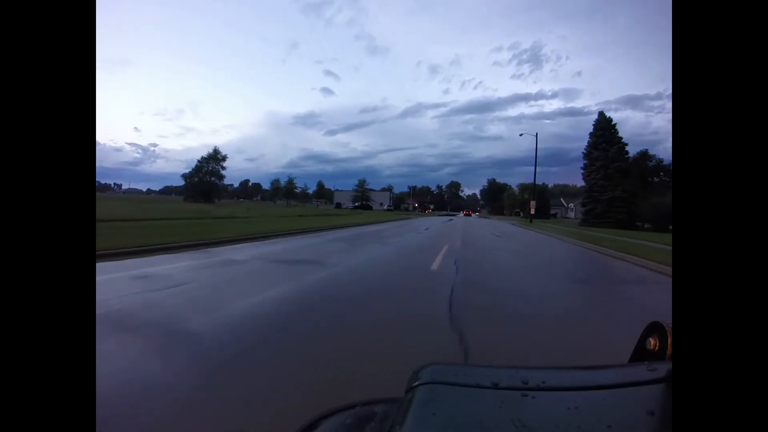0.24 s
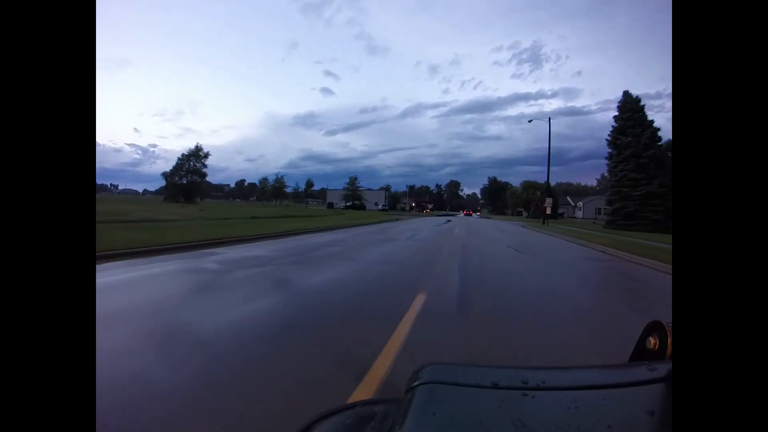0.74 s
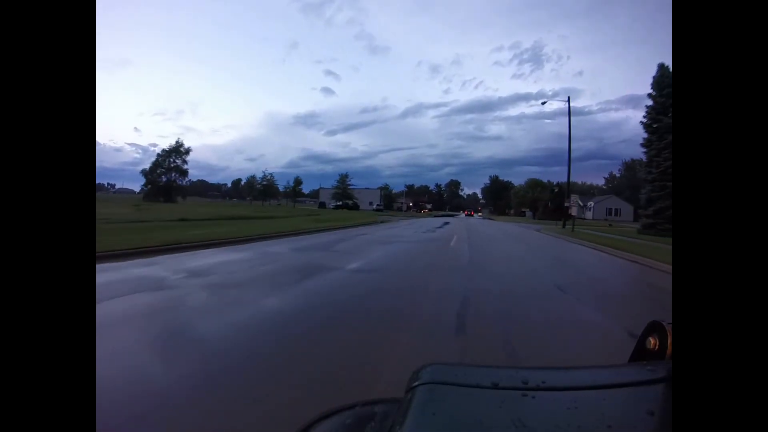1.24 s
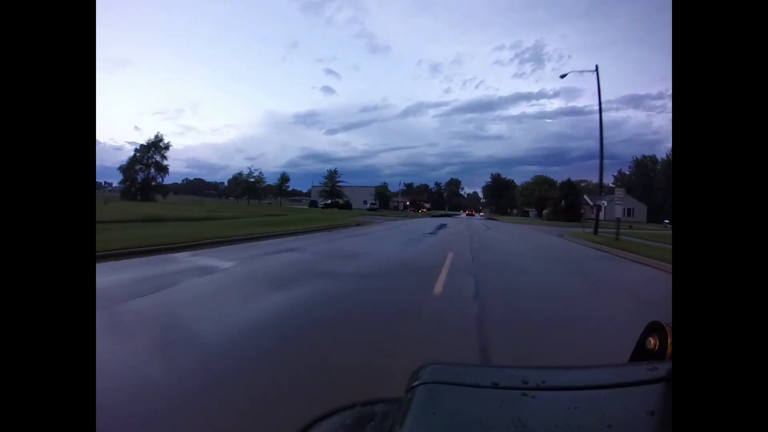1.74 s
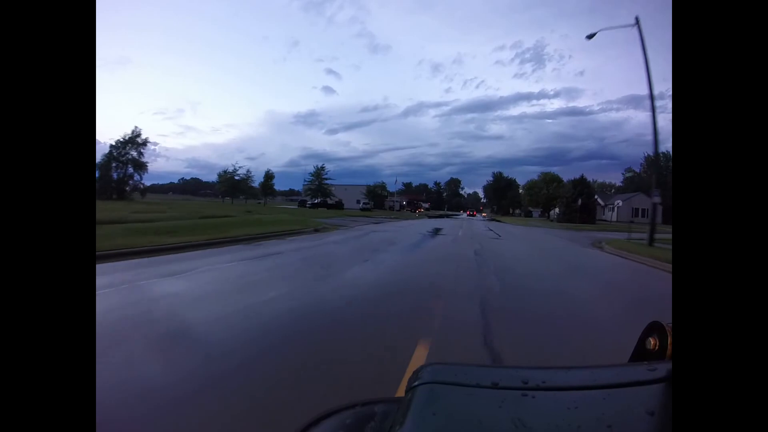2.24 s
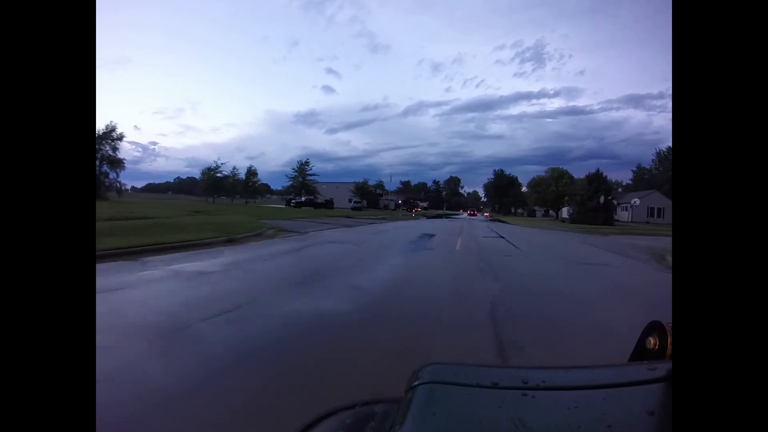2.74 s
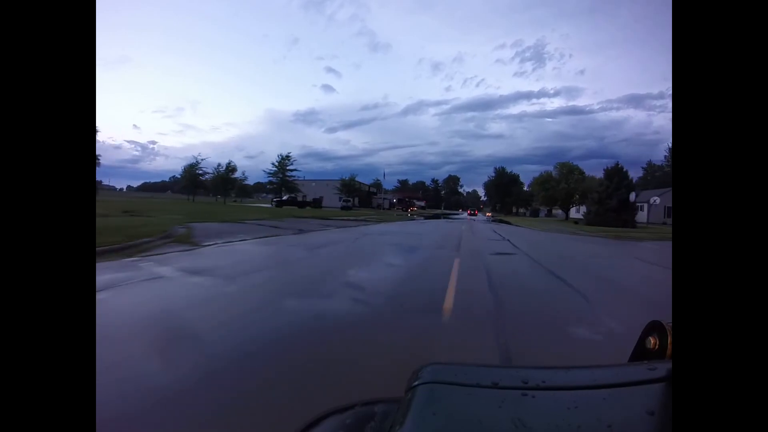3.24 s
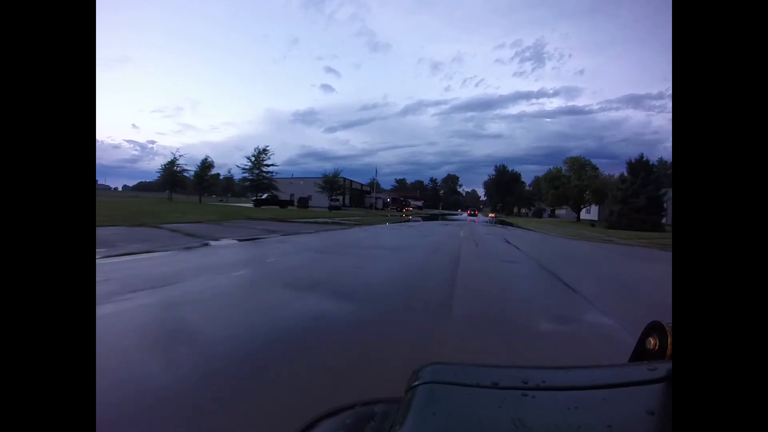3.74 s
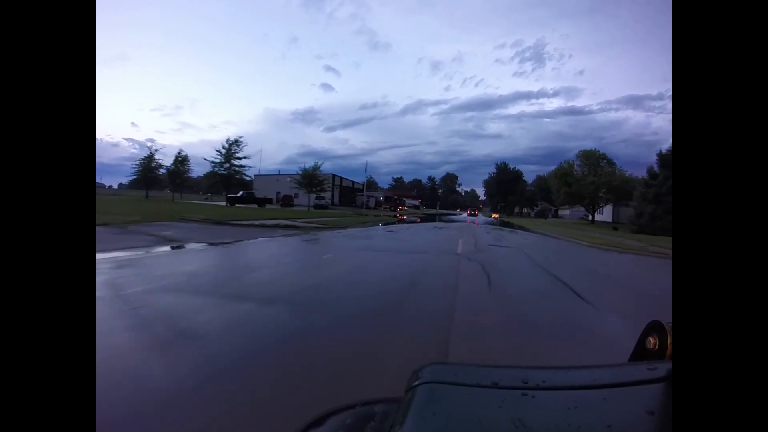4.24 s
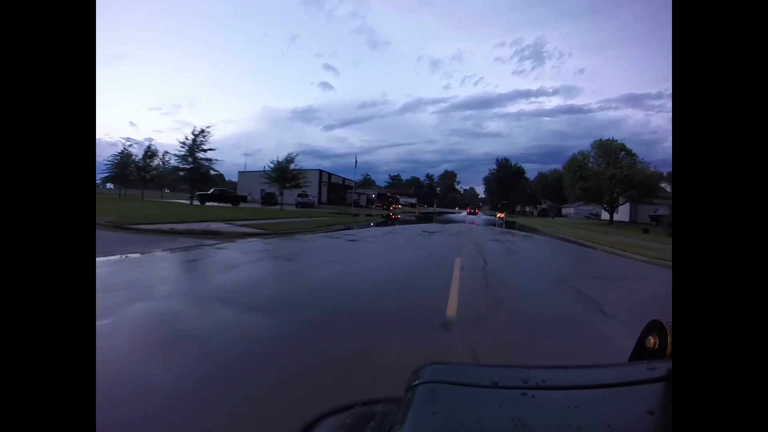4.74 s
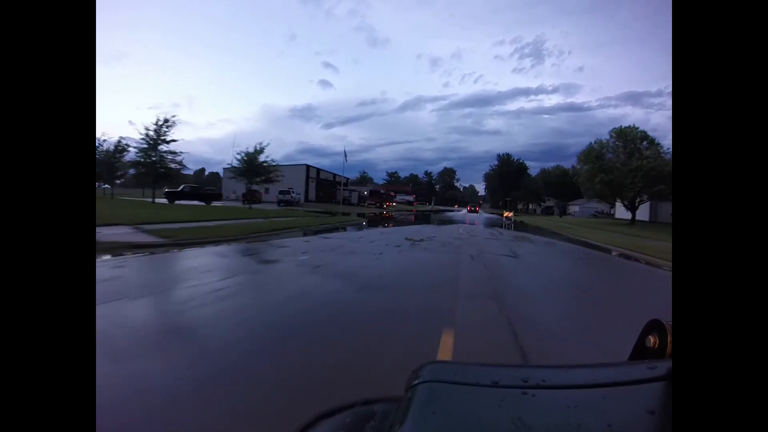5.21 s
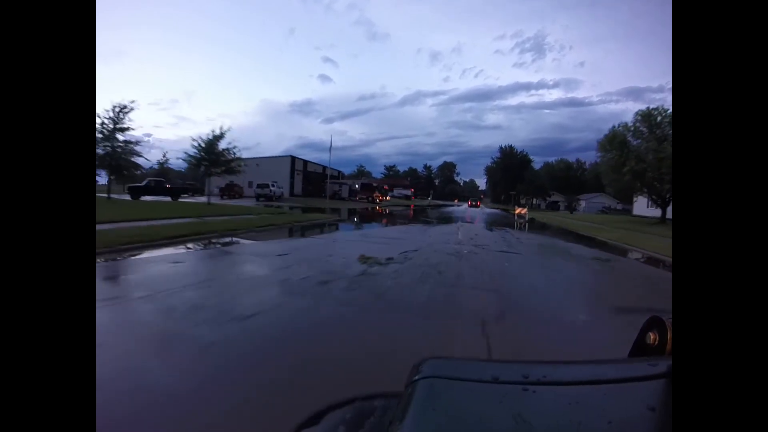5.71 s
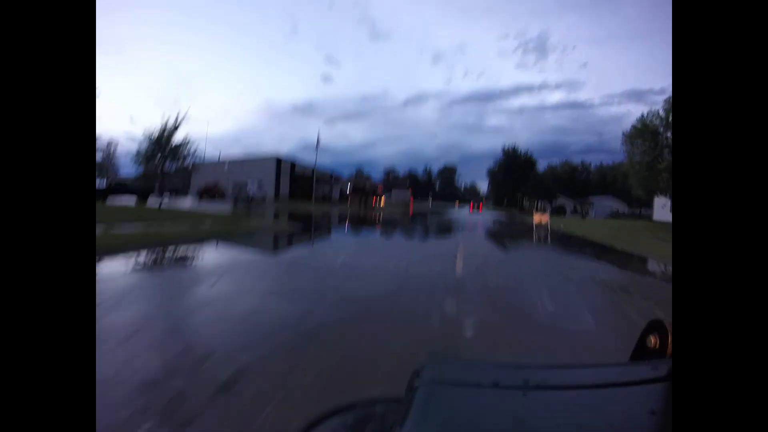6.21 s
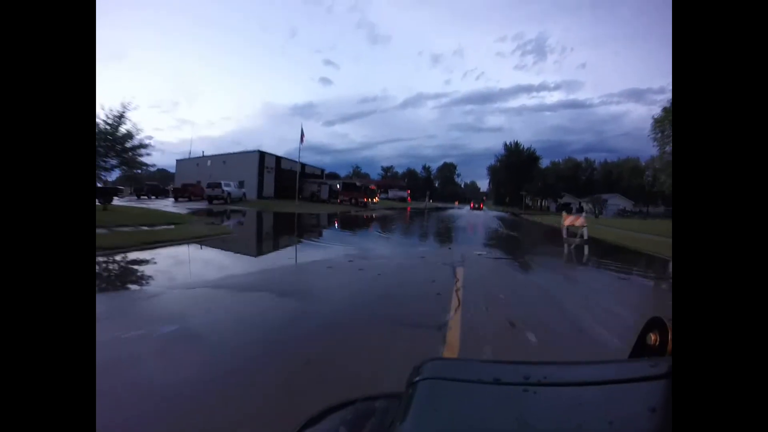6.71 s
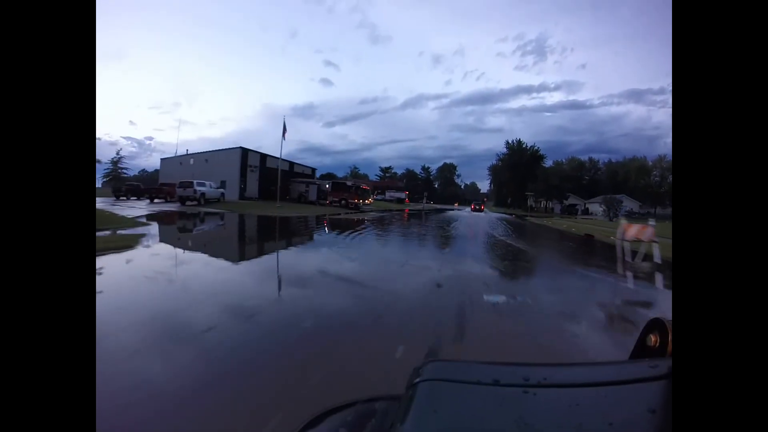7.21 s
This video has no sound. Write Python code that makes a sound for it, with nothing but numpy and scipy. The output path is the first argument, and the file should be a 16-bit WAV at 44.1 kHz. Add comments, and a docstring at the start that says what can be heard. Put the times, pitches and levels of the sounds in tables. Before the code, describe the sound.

A vehicle drives along a wet street in the open air, heard from a microphone mounted on its body. From 0 s, deep road rumble, drivetrain drone and soft tyre hiss run together, with puddle splashes before 0.4 s. Wind buffeting swells strongly from about 0.4 to 1.2 s, a low throbbing with fluttery gusts. A dull knock and body thump land at 1.9 s, a smaller one at 2.2 s with a sharp tick, and a gust at 2.6 s. Between 3.7 and 4.6 s come light plastic knocks and gusts; more small bumps follow at 5.2 and 5.4 s. The drone gradually sinks and fades. Around 5.9 s the wind falls away, and watery hiss and fine spray rise. At 6.25 s a hard, boomy double bump rattles the mount with a brief splash; a softer thud follows at 6.7 s. Rumble and spray continue, with slight wind near 7.4 s.

```python
"""Wind buffets the microphone first, over the low road rumble of a vehicle on a wet street, slowing into floodwater.
The place is open air; the microphone rides in a camera on the body, with no distance to any source but the mount.
Wind, rumble, tyre hiss and spray are shaped noise, the last two with droplets; the drivetrain drone is a set of sines.
Puddle splashes are bursts of droplets; mount knocks and body thumps, hardest over a bump in the flooded stretch,
are decaying sines, and one tick is a pressure step. The camera's case colours all but drone, thumps and tick."""
import sys
import numpy as np
from scipy import signal
from scipy.fft import rfft, irfft, next_fast_len
from scipy.io import wavfile
from scipy.ndimage import uniform_filter1d, map_coordinates

SR = 44100
rng = np.random.default_rng(int(sys.argv[2]) if len(sys.argv) > 2 else 0)


def generate_wav(signal):
    """Clip the signal to [-1, 1] and save it as 16-bit WAV at the path in sys.argv[1]."""
    frames = np.transpose(np.atleast_2d(signal))
    scaled = np.clip(frames, -1, 1) * 32767
    pcm = np.round(scaled).astype(np.int16)
    wavfile.write(sys.argv[1], SR, pcm)


N = 328986

# airflow at the microphone, dropping as the vehicle brakes for the flood: start_s [s], buffet_db [dB before gusts]
WIND_LEVEL = [(0, -31), (.45, -25.5), (.9, -25), (1.35, -30.5), (1.8, -29), (2.15, -30), (2.75, -29),
              (3.3, -30.5), (3.9, -28), (4.7, -28.5), (5.55, -30.5), (5.88, -54), (6.55, -48), (7.46, -40)]
# single gusts, and lulls where negative: peak_s [s], lift_db [dB]
GUST_LIFTS = [(.36, 4), (1.61, 5.5), (1.92, 6), (2.32, -3), (2.635, 8.5), (3.72, 6), (4.178, 5.5),
              (4.559, 10), (5.16, 5), (5.09, -5.5), (5.36, -12), (5.502, 3.5), (7.41, 7.5)]
# wind spectrum at the microphone: frequency_hz [Hz], density_db [relative dB per Hz]
BUFFET_SPECTRUM = [(10, -7), (22, -6.5), (33, -2.5), (43, 2.5), (50, -1), (58, 1), (72, -11), (95, -20),
                   (160, -15.5), (200, -18), (235, -29), (400, -38), (1000, -67.5), (3000, -88)]
# road and tyres, the hiss fading as the vehicle slows and returning in deeper water:
# start_s [s], rumble_db [dB before trim], hiss_db [dB before trim], spray_db [dB before trim]
ROAD_LEVELS = [(0, -39.5, -47, -61), (1.2, -39, -47, -62.5), (2.4, -40.5, -47.5, -62.5),
               (3.1, -44, -50, -63), (3.6, -41, -49, -64), (4.3, -42, -51, -67.5),
               (5.45, -40, -54.5, -66.5), (6.05, -40.5, -51, -60.5), (6.6, -40.5, -49, -61.5),
               (7.05, -39, -51, -61), (7.46, -42, -53, -61.5)]
# body shaken by the road: frequency_hz [Hz], density_db [relative dB per Hz]
RUMBLE_SPECTRUM = [(20, -28), (70, -1), (105, 2.5), (152, 0.5), (175, 1.5), (197, -3), (222, -7), (260, 1),
                   (310, -8.5), (400, -13.5), (550, -22.5), (730, -28.5), (1000, -34.5), (2500, -47.5)]
# drivetrain: start_s [s], turns_hz [Hz before wander], drone_db [dB against the untrimmed road rumble]
DRIVETRAIN = [(0, 39.74, -1.5), (1.5, 39.29, -4.5), (2.6, 38.4, -2), (4, 37.6, -3.5), (5.5, 36.58, -8.5),
              (7.46, 35.33, -11.5)]
# harmonics of its drone: order [multiple of turns_hz], level_db [relative dB]
DRONE_ORDERS = [(3, -2), (4, -2), (5, 0), (7, -10.5)]
# water peeling off the tread: frequency_hz [Hz], density_db [relative dB per Hz]
HISS_SPECTRUM = [(200, -8), (500, -4), (750, 0), (960, -6), (1400, -3), (1950, -4.5), (2400, 1),
                 (2850, -0.5), (3150, -10), (4200, -14.5), (5200, -19.5), (8000, -26), (16000, -68)]
# fine spray on the body: frequency_hz [Hz], density_db [relative dB per Hz]
SPRAY_SPECTRUM = [(1500, -19), (3500, 6.5), (5000, 2.5), (7300, 0.5), (8200, -5.5), (9400, -2),
                  (11000, -7.5), (12400, -13), (13200, -13), (14300, -9), (15000, -12.5)]
# tyres slapping through puddles: peak_s [s], level_db [dB], half_s [s from the peak to 1/e]
PUDDLES = [(0.062, -48, 0.029), (0.282, -44, 0.052), (1.86, -50, 0.023), (6.106, -53.5, 0.073),
           (6.266, -42, 0.003), (6.55, -51, .02), (6.852, -56, 0.02), (6.74, -49.5, .008)]
# drops thrown from a puddle: frequency_hz [Hz], density_db [relative dB per Hz]
SPLASH_SPECTRUM = [(700, -18), (1600, -10), (2500, 20.5), (3300, 6.5), (4500, 0.5), (5800, -2), (9000, -24),
                   (15000, -34)]
# knocks of the camera mount: start_s [s], level_db [dB before mode and case gains], pitch_hz [Hz]
MOUNT_KNOCKS = [(1.849, -31, 2060), (1.898, -19, 1240), (2.165, -31, 795), (3.226, -32, 1380),
                (3.748, -24, 790), (3.9333, -23.5, 780), (4.151, -25.5, 805), (4.493, -25.5, 720),
                (5.439, -31.5, 1100), (6.2591, -14.5, 1120), (6.265, -38, 2000), (6.268, -21, 2030),
                (6.308, -29, 1970), (6.3125, -18.5, 1185), (6.3139, -19, 1660), (6.684, -27, 744),
                (6.7376, -28.5, 1360)]
# the mount's modes: ratio [multiple of pitch_hz], level_db [relative dB], t60_s [s to fall 60 dB]
MOUNT_MODES = [(.6, -1.5, .011), (1, 1, 0.0091), (1.45, -1, 0.0052), (2.2, -5, 0.0052)]
# jolts of the body: start_s [s], level_db [dB before mode gains], pitch_hz [Hz], t60_s [s to fall 60 dB]
BODY_JOLTS = [(1.899, -13.5, 45, 0.15), (1.898, -23, 258, 0.048), (2.164, -27.5, 201, 0.066),
              (2.642, -31.5, 308, 0.044), (3.746, -26, 220, .022), (3.955, -27.5, 239, 0.098),
              (4.183, -30, 335, 0.018), (4.494, -26, 150, 0.084), (4.557, -33.5, 340, .045),
              (5.157, -28, 170, 0.054), (5.437, -26.5, 276, 0.033), (6.2515, -12.5, 142, 0.089),
              (6.259, -15.5, 239.5, 0.096), (6.262, -20.5, 54, 0.11), (6.297, -21, 64, 0.1),
              (6.308, -9.5, 242, 0.026), (6.663, -20, 194.6, 0.051), (6.675, -21, 35.3, 0.13),
              (6.681, -20.5, 166, 0.042)]
# the body's modes in a jolt: ratio [multiple of pitch_hz], level_db [relative dB]
BODY_MODES = [(.58, -6), (1, 2.5), (1.5, -12), (1.95, -15)]
# one sharp tick: start_s [s], level_db [dB]
SHARP_TICK = (2.2223, -19.5)
# resonances of the camera's case: centre_hz [Hz], width_hz [Hz], lift_db [dB]
CASE_RESONANCES = [(1120, 64, 4), (1370, 42, 4), (1609, 213, 9), (2223, 110, 4.5), (5727, 420, 8),
                   (8780, 490, 8), (10500, 300, 4.5)]

GUST_HALF_S = 0.031  # from a gust's peak to 1/e of its lift in dB
TURBULENCE_DB, TURBULENCE_RATE = 2.5, 28  # scale of random swings, and knots a second
GUST_FLUTTER = 0.34  # the flutter rises by this share of the gust lift in dB
RATTLE_DB, RATTLE_HZ = -42, 746  # faint random knocks, level before mode and case gains
RATTLE_UNTIL_S = 6  # the faint knocks end once the vehicle has slowed
TOP_HZ = 15350  # nothing sounds above this frequency


def amp(db):
    """Decibels to gain."""
    return 10 ** (np.asarray(db) / 20)


def unit(x):
    """Scale to rms 1."""
    return x / np.sqrt(np.mean(x ** 2) + 1e-20)


def along(points, hz):
    """Read (Hz, value) points on a log frequency axis."""
    f, v = np.transpose(points)
    return np.interp(np.log(hz + 1), np.log(f + 1), v)


def curves(rows):
    """One value per sample for each column after the time."""
    s, *cols = np.transpose(rows)
    return [np.interp(np.arange(N) / SR, s, c) for c in cols]


def wobble(rate):
    """A smooth random curve through normal draws, rate knots a second."""
    knots = rng.standard_normal(int(N * rate / SR) + 4)
    return map_coordinates(knots, [np.arange(N) * rate / SR])


def filtered(x, response):
    """Multiply the spectrum of x by a response of frequency."""
    m = next_fast_len(N + SR // 2)
    return irfft(rfft(x, m) * response(np.fft.rfftfreq(m, 1 / SR)), m)[:N]


def case_db(hz):
    """The lift that the hollows of the camera's case give to each frequency."""
    return sum(db / (1 + ((hz - centre) / (width / 2)) ** 2) for centre, width, db in CASE_RESONANCES)


def coloured(x, spectrum):
    """Give x a spectrum and the case's resonances, at rms 1."""
    return unit(filtered(x, lambda hz: amp(along(spectrum, hz) + case_db(hz))))


def steadied(x, seconds):
    """Even out the slow swells of x, at rms 1."""
    power = np.abs(uniform_filter1d(x ** 2, max(2, int(seconds * SR))))
    return unit(x / np.sqrt(power + 1e-6))


def rush(patchy_db):
    """White noise with drifting patches of random gain, at rms 1."""
    z = signal.stft(rng.standard_normal(N), nperseg=512)[2]
    across_pitch = uniform_filter1d(rng.standard_normal(z.shape), size=6, axis=0)
    patches = unit(uniform_filter1d(across_pitch, size=14, axis=1))
    return unit(signal.istft(z * amp(patchy_db * patches), nperseg=512)[1][:N])


def droplets(rate, spread_db):
    """Tiny impacts of random size and sign at random moments, rate a second on average, at rms 1."""
    hits = rng.random(N) < rate / SR
    push = rng.uniform(-0.89, 1, N)
    size = amp(spread_db * rng.uniform(-1.04, 1, N))
    return unit(hits * push * size)


def add(track, s, sound):
    """Mix a sound into the track at a time."""
    part = track[max(0, round(s * SR)):][:len(sound)]
    part += sound[:len(part)]


def throb(hz, drift):
    """A deep, nearly steady pulsation of rms 1 with a wandering phase."""
    return unit(np.sin(2 * np.pi * hz * np.arange(N) / SR + drift * wobble(6)))


def gusts_db():
    """Lift of the wind over its set level: single gusts and random turbulence."""
    t = np.arange(N) / SR
    swells = sum(db * np.exp(-((t - s) / GUST_HALF_S) ** 2) for s, db in GUST_LIFTS)
    return swells + TURBULENCE_DB * wobble(TURBULENCE_RATE)


def wind():
    """Eddies shed round the camera throb at a low pitch; their peaks break into brief flutter."""
    buffet_db, = curves(WIND_LEVEL)
    lift_db = gusts_db()
    churn = coloured(rng.standard_normal(N), BUFFET_SPECTRUM)
    eddies = steadied(churn + amp(-1.0) * throb(hz=41.25, drift=0.43), seconds=0.1175)
    # frequency_hz, density_db
    flutter_spectrum = [(60, -28), (160, 6.0), (205, 2), (250, -10),
                        (400, -15.0), (800, -15.0), (1400, -28.5), (4000, -48)]
    flutter = coloured(rng.standard_normal(N), flutter_spectrum)
    bursts = unit(np.abs(eddies) ** 1.47 * flutter)
    buffeting = amp(lift_db - 0.87) * eddies
    return amp(buffet_db) * (buffeting + amp(GUST_FLUTTER * lift_db - 20.0) * bursts)


def drivetrain_drone(turns_hz):
    """Harmonics of the turning drivetrain, each wavering in level and phase, at rms 1."""
    angle = 2 * np.pi * np.cumsum(turns_hz * (1 + 0.00409 * wobble(5))) / SR
    drone = np.zeros(N)
    for order, db in DRONE_ORDERS:
        level = amp(db + 1.85 * wobble(2.23))
        drone += level * np.sin(order * angle + 0.14 * order * wobble(9))
    return unit(drone)


def road():
    """The rolling tyres shake the body, and the drivetrain drone sinks in pitch as the vehicle slows."""
    rumble_db, _, _ = curves(ROAD_LEVELS)
    turns_hz, drone_db = curves(DRIVETRAIN)
    drone = drivetrain_drone(turns_hz)
    rumble = steadied(coloured(rng.standard_normal(N), RUMBLE_SPECTRUM), seconds=0.13)
    return amp(rumble_db) * (amp(-2.5) * rumble + amp(drone_db) * drone)


def tyres():
    """Water peels off the tread in a hiss; droplets and fine spray patter on the body."""
    _, hiss_db, spray_db = curves(ROAD_LEVELS)
    surge_db = .7 * wobble(24)
    water = rush(patchy_db=1.5) + amp(-4.0) * droplets(rate=1000, spread_db=6)
    hiss = steadied(coloured(water, HISS_SPECTRUM), seconds=0.14)
    mist = rush(patchy_db=1.0) + amp(-8.0) * droplets(rate=1800, spread_db=10)
    spray = coloured(mist, SPRAY_SPECTRUM)
    return amp(surge_db) * (amp(hiss_db + 0.88) * hiss + amp(spray_db + 0.2) * spray)


def splashes():
    """Each puddle throws up a short, bright burst of drops."""
    t = np.arange(N) / SR
    swell = sum(amp(db) * np.exp(-((t - s) / half) ** 2) for s, db, half in PUDDLES)
    return swell * coloured(droplets(rate=5500, spread_db=-12.0), SPLASH_SPECTRUM)


def rattle(count):
    """Faint knocks at random moments while the vehicle is at speed."""
    return [(RATTLE_UNTIL_S * u, RATTLE_DB, RATTLE_HZ) for u in rng.random(count)]


def knocks():
    """The mount takes up its play with short, dull plastic knocks, each with a brief scrape."""
    out, t = np.zeros(N), np.arange(SR // 20) / SR
    for s, db, hz in MOUNT_KNOCKS + rattle(count=6):
        ring = np.zeros(len(t))
        for k, (ratio, level, t60) in enumerate(MOUNT_MODES):
            decay = amp(level + rng.normal(0, 1) - 60 * t / t60)
            ring += (-1) ** k * decay * np.sin(2 * np.pi * hz * ratio * t)
        scrape = rng.standard_normal(len(t)) * amp(-3.5 - 60 * t / 0.03)
        # a soft contact passes little above twice the knock's pitch
        contact = signal.butter(3, [hz * .35, hz * 2], "band", fs=SR, output="sos")
        add(out, s, amp(db) * signal.sosfilt(contact, ring + scrape))
    return filtered(out, lambda hz: amp(case_db(hz) - 5.5))


def jolts():
    """Bumps in the road set the body booming for a few cycles; opposed modes round off the onset."""
    out, t = np.zeros(N), np.arange(SR // 4) / SR
    onset = 1 - np.exp(-t / 0.0022)
    for s, db, hz, t60 in BODY_JOLTS:
        boom = sum((-1) ** k * amp(level) * np.sin(2 * np.pi * hz * ratio * t)
                   for k, (ratio, level) in enumerate(BODY_MODES))
        add(out, s, amp(db - 60 * t / t60) * onset * boom)
    return out


def tick():
    """A sharp tick: a pressure step that relaxes within a few milliseconds."""
    out, t = np.zeros(N), np.arange(SR // 50) / SR
    start_s, level_db = SHARP_TICK
    add(out, start_s, -amp(level_db) * np.exp(-t / .0006))
    return out


def scene():
    """Everything reaches the one microphone directly, in the open air."""
    return (wind() + road() + tyres() + splashes() + knocks() + jolts() + tick())[None]


def record(dry):
    """The sound ends at a sharp upper band limit."""
    return filtered(dry[0], lambda hz: hz < TOP_HZ)[None]


dry = scene()
out = record(dry)
generate_wav(out)
```